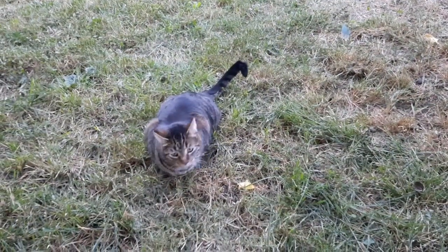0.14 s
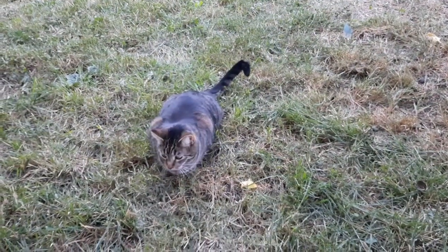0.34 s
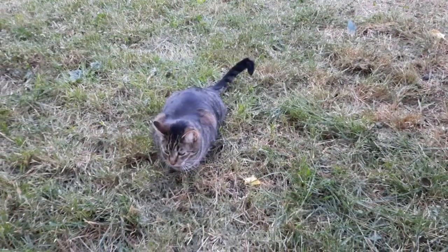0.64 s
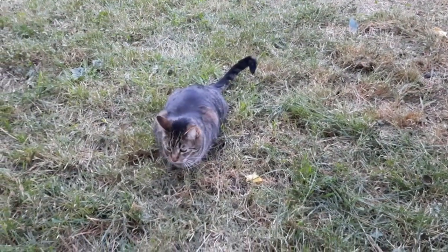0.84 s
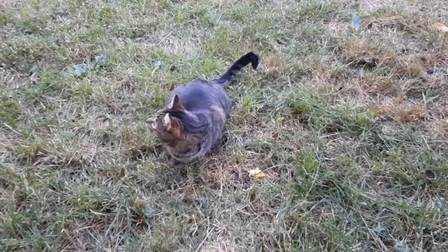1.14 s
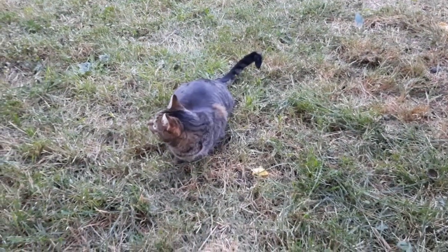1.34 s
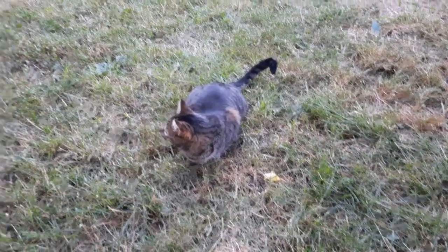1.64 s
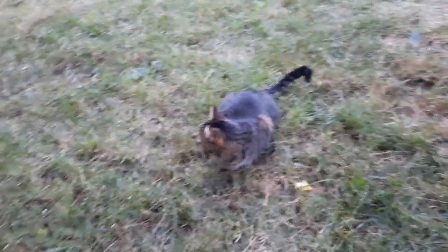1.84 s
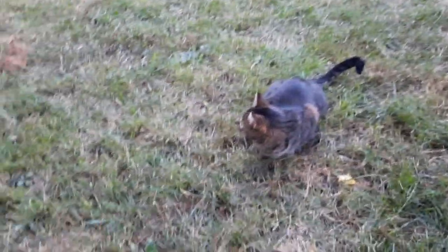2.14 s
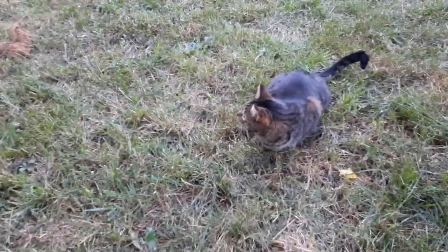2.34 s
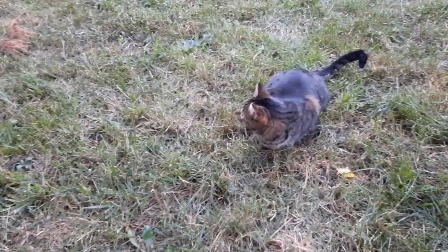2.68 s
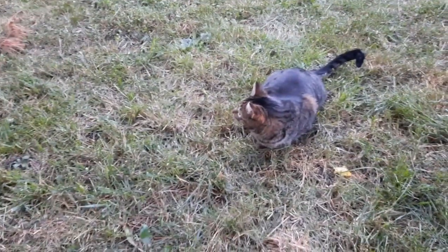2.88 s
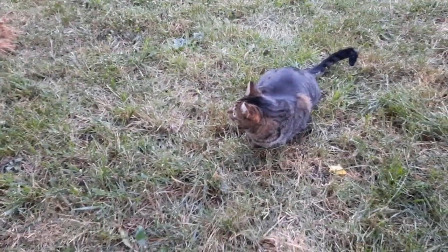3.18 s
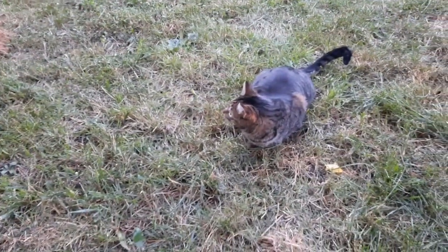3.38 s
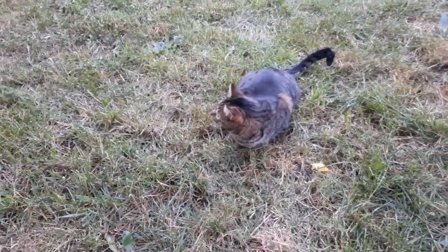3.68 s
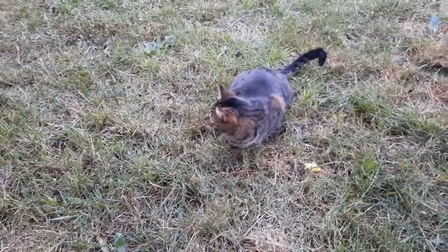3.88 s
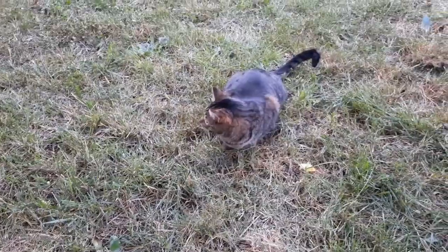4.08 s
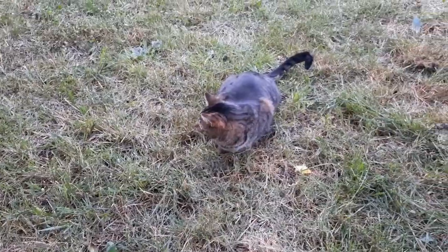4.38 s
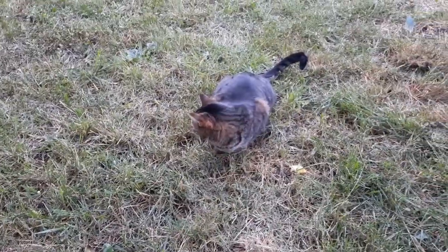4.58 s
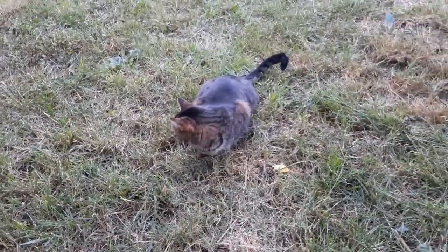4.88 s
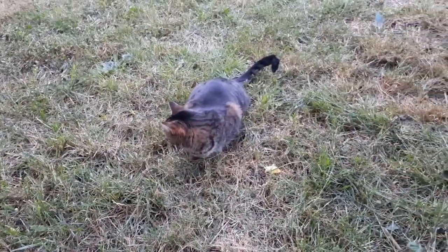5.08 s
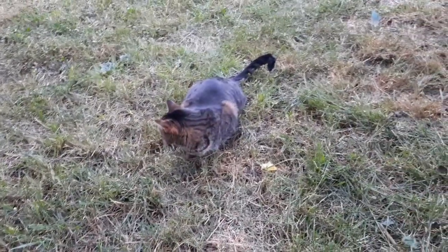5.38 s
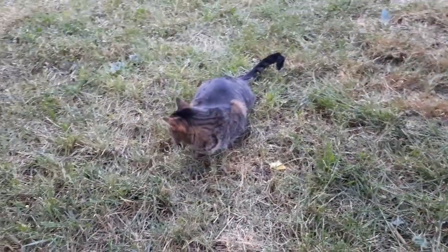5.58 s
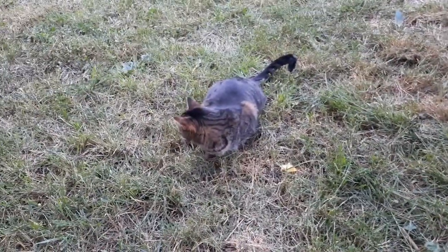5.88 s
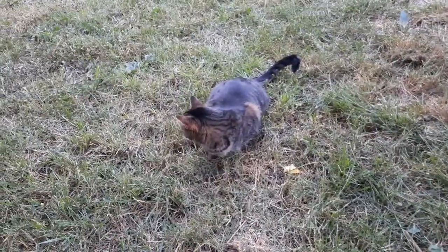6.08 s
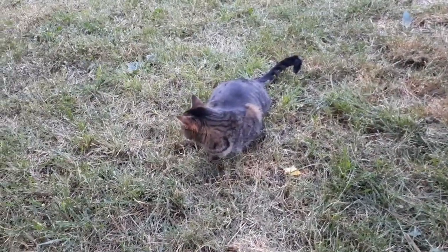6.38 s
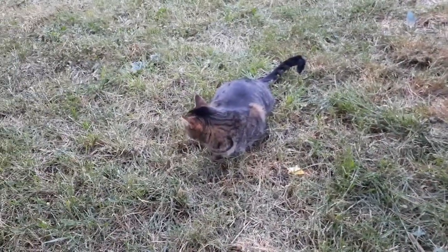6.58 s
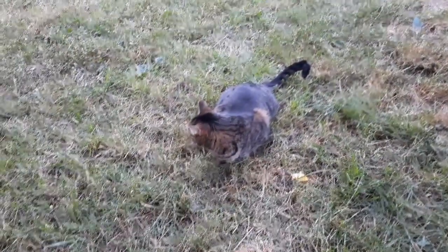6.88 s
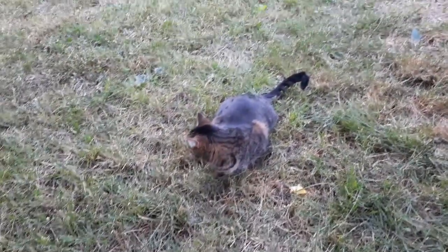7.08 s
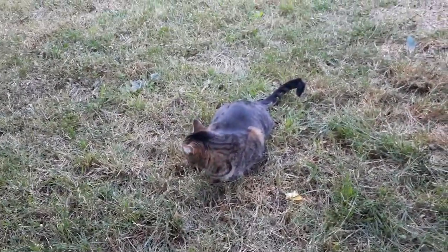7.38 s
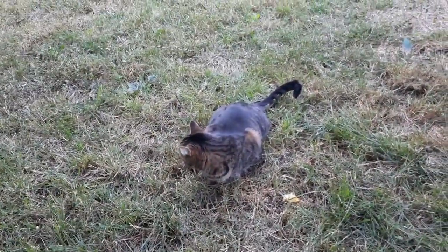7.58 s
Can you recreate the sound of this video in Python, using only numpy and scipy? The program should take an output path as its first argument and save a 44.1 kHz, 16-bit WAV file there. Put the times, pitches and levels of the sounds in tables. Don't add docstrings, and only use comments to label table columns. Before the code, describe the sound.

Shrill crickets trill steadily over a lawn while a nearby bird gives sparse sharp chips with short echoes, above a faint low hum and distant traffic.

```python
import sys
import numpy as np
from scipy import signal
from scipy.fft import rfft, irfft
from scipy.io import wavfile
from scipy.ndimage import uniform_filter1d

SR = 44100
rng = np.random.default_rng(int(sys.argv[2]) if len(sys.argv) > 2 else 0)


def how_loud(loudness_db):
    steps = np.asarray(loudness_db, float) / 20
    return 10 ** steps


def file_out(sig):
    cols = np.atleast_2d(sig).T
    lim = np.clip(cols, -1, 1)
    pcm = np.round(lim * 32767).astype(np.int16)
    wavfile.write(sys.argv[1], SR, pcm)


N = 340893
T = np.arange(N) / SR


def evened(x):
    return x / np.sqrt(np.mean(x ** 2) + 1e-20)


def read(table, hz, axis=1):
    table = np.array(table)
    return np.interp(np.log(hz + 1), np.log(table[:, 0] + 1), table[:, axis])


def curve(table, t, axis=1):
    table = np.array(table)
    return np.interp(t, table[:, 0], table[:, axis])


def sides(pan_db):
    return how_loud(np.array([.5 * pan_db, -.5 * pan_db]))


def drift(hz):
    rate = 400
    count = int(N / SR * rate) + 2
    pole = np.exp(-2 * np.pi * hz / rate)
    slow = signal.lfilter([1], [1, -pole], rng.standard_normal(count))
    return np.interp(T, np.arange(count) / rate, evened(slow))


def noise(db, same, size, patchy_db, lag_s=0):
    frames = 4 * N // size + 5
    hz = np.fft.rfftfreq(size, 1 / SR)[:, None]
    a, b, c, d, patches = rng.standard_normal((frames, len(hz), 5)).T
    patches = uniform_filter1d(patches, size=10, axis=0)
    patches = evened(uniform_filter1d(patches, size=10, axis=1))
    same = np.clip(same(hz), 0, 1)
    right = a + 1j * b
    delay = np.exp(-2j * np.pi * hz * lag_s)
    left = same * right * delay + np.sqrt(1 - same ** 2) * (c + 1j * d)
    level = db(hz, np.arange(frames) * size / 4 / SR) + patchy_db * patches
    z = np.array([left, right]) * how_loud(level)
    return evened(signal.istft(z, nperseg=size, noverlap=3 * size // 4)[1][:, :N])


# f/Hz, t60/s
YARD_DECAY = [(4500, 0.5), (6000, 0.4), (7500, 0.4), (11000, 0.38), (15000, 0.33)]
# f/Hz, likeness [0-1]
ECHO_LIKENESS = [(4500, .1), (6000, .4), (7100, .35), (7700, .75), (8400, .85), (12000, .55)]


def echoes(late_db, late_slowing, size):
    taps = np.zeros((2, size))
    at = np.arange(40, size - 20, 20) + rng.integers(0, 20, (2, (size - 41) // 20))
    strength = rng.standard_normal(at.shape) * how_loud(0.67 * rng.standard_normal(at.shape))
    np.put_along_axis(taps, at, strength, 1)
    taps *= 1 + 0.2 * np.exp(-np.arange(size) / SR / 0.045)
    hz, t, z = signal.stft(taps, SR, nperseg=128)
    alike = read(ECHO_LIKENESS, hz)[:, None]
    z = np.array([z[0], alike * z[0] + np.sqrt(1 - alike ** 2) * z[1]])
    fall_db = -60 * t / np.maximum(read(YARD_DECAY, hz), .05)[:, None]
    decay = how_loud(fall_db) + how_loud(late_db + fall_db / late_slowing)
    tail = signal.istft(z * decay, SR, nperseg=128)[1]
    return tail / np.linalg.norm(tail[0])


def scattered(x, clear, pan_db):
    clear = np.clip(clear, 0, 1)
    paths = echoes(late_db=-60, late_slowing=1, size=4096)
    wet = signal.oaconvolve(x[None], paths, axes=1)[:, :N]
    return sides(pan_db)[:, None] * (np.sqrt(clear) * x + np.sqrt(1 - clear) * wet)


PITCH_SCATTER = .01


def stridulate(hz, per_s, duty, sag):
    turns = np.cumsum(per_s * (1 + .006 * drift(1.5))) / SR + rng.random()
    u = np.minimum(turns % 1 / np.clip(duty, .1, 1), 1)
    strong, high, start = rng.standard_normal((1200, 3))[turns.astype(int) % 1200].T
    wing = hz * (1 + sag * (.5 - u) + PITCH_SCATTER * high)
    tone = np.sin(2 * np.pi * np.cumsum(wing) / SR + 2 * start)
    return evened(how_loud(0.57 * strong) * np.sin(np.pi * u) ** 2 * tone)


# wing f/Hz, level/dB, left-right level/dB, clear share [0-1]
TRILLERS = [(7500, 1, -4, .8), (7700, -3, 0, .35), (7980, -2.5, 1, .25), (7230, -7, -5, .15),
            (8170, -4, 2, .3), (8480, -11, 5, .3), (7820, -4, 0, .15), (6990, -15, -4, .1)]
STROKES_PER_S = [50.5, 50.7, 47.5, 52.5, 98.5, 101.2, 55, 58]
# t/s, level/dB, left-right level/dB
TRILL_COURSE = [(0.0, -65.5, 3.5), (0.64, -65, 4), (1.42, -63.5, 1.5), (2.2, -64.5, -1), (3.25, -63.5, 1),
                (4.0, -66, 3), (5.3, -65, 2), (6.1, -64, -2), (7.73, -65.5, 0)]
SWELL_DB = 1.6


def trill():
    out = 0
    for (hz, db, pan_db, clear), per_s in zip(TRILLERS, STROKES_PER_S):
        level = how_loud(db + SWELL_DB * drift(1.0))
        out = out + level * scattered(stridulate(hz, per_s, duty=0.49, sag=.05), clear, pan_db)
    return evened(out) * how_loud(curve(TRILL_COURSE, T) + 6.5) * sides(curve(TRILL_COURSE, T, axis=2))


# middle t/s, level/dB, length t/s
CHIRP_WAVES = [(.1, -68, 0.36), (0.616, -63.5, 0.25), (1.0, -69, 0.27), (1.4, -67.5, 0.22),
               (1.857, -65, .22), (2.27, -64, 0.27), (2.63, -64, 0.25), (3.04, -67, 0.47),
               (3.463, -67.5, 0.41), (3.973, -66, 0.31), (4.3, -70, 0.14), (4.5, -65, 0.18),
               (4.72, -64.5, 0.17), (5.04, -68.5, 0.36), (5.467, -66.5, 0.2), (5.778, -68, 0.31),
               (6.17, -68, 0.43), (6.58, -62.5, 0.32), (6.994, -68, 0.19), (7.23, -67, .18),
               (7.5, -76, .12), (7.677, -72, .12)]
FIELD_WING_HZ, FIELD_REST_DB = 4655, -81.5


def chirps():
    wing = FIELD_WING_HZ * (1 + .012 * drift(3.0))
    out = 0
    for share, per_s in [(1.0, 24.5), (.975, 29), (1.025, 21)]:
        out = out + scattered(stridulate(wing * share, per_s, duty=0.48, sag=0.028), 0.03, 2.1)
    waves = 0
    for s, db, length in CHIRP_WAVES:
        waves = waves + how_loud(db) * np.cos(np.pi * np.clip(0.65 * (T - s) / length, -.5, .5)) ** 2
    return evened(out) * (waves + how_loud(FIELD_REST_DB)) * how_loud(-5.0)


SWEEP_HZ, OVERTONE_DB = 2570, -12
LOUDEST, ACCENT = .57, .7
LAG_PER_DB = 2.4
AVERTED = .4


def chip(peak_db, pan_db, start_hz, echo_db):
    u = np.arange(420) / 420
    hz = start_hz + SWEEP_HZ * np.sin(1.83 * u) ** 1.307
    phase = 2 * np.pi * np.cumsum(hz) / SR
    swell = ACCENT * np.exp(-((u - LOUDEST) / .14) ** 2) + (1 - ACCENT) * np.sin(np.pi * u)
    overtone = how_loud(OVERTONE_DB) * np.sin(np.pi * u ** 0.71) ** 1.9 * np.sin(2 * phase)
    whistle = swell * np.sin(phase) + overtone
    direct = whistle - (1 - how_loud(-AVERTED * max(echo_db, 0))) * overtone
    yard = echoes(late_db=-12.0, late_slowing=1.76, size=22050)
    wet = signal.fftconvolve(whistle[None], yard, axes=1)
    wet = how_loud(echo_db) * sides(0.19 * pan_db - 2.5)[:, None] * wet
    lag = round(LAG_PER_DB * max(-pan_db, 0))
    wet[0, lag:lag + len(u)] += sides(pan_db)[0] * direct
    wet[1, :len(u)] += sides(pan_db)[1] * direct
    return how_loud(peak_db + 3) * wet


# t/s, direct peak level/dB, left-right level/dB, sweep start f/Hz, echo over direct level/dB
CHIPS = [
    (.4964, -15.5, -7.5, 5000, -7),
    (1.1795, -28, -4, 4900, 2),
    (2.159, -36, 0, 4950, 8),
    (3.1122, -38, 1, 5200, 9),
    (3.979, -34, 1, 5250, 7),
    (6.4906, -34, 6, 5250, 9),
]
# t/s, peak level/dB, f/Hz, length t/s, glide [share of f]
WHISTLES = [(.09, -69, 3520, .04, 0), (.652, -64, 4060, .014, -.02), (.72, -70, 3620, .04, 0),
            (4.98, -67, 2180, .05, .1), (5.45, -70, 3350, .07, 0), (5.72, -63, 3420, .028, -.05),
            (5.79, -70, 3480, .08, -.02), (6.35, -64, 3400, .03, 0), (6.43, -69, 3900, .02, 0),
            (6.45, -67, 3400, .025, 0), (6.70, -69, 3380, .04, 0), (7.18, -69, 3800, .02, 0),
            (7.195, -64, 3280, .04, -.07), (7.26, -70, 3880, .02, 0), (7.28, -67, 3300, .04, 0)]
# f/Hz, level/dB
RIGHT_PORT = [(8000, -1.5), (8600, -8), (10500, -48.5), (13000, -26), (16000, -8)]
FAR_DB = -1.5


def birds():
    near, far = np.zeros((2, N + SR)), np.zeros(N + SR)
    for s, *row in CHIPS:
        sound, at = chip(*row), round((s - .005) * SR)
        near[:, at:at + sound.shape[1]] += sound
    for s, db, hz, length, glide in WHISTLES:
        u = np.arange(0, 1, 1 / (1.1 * length * SR))
        wander = evened(uniform_filter1d(rng.standard_normal(len(u)), size=200))
        warble = glide * (u - .5) + .02 * wander
        tone = np.sin(2 * np.pi * np.cumsum(hz * (1 + warble)) / SR)
        far[round(s * SR):][:len(u)] += how_loud(db - FAR_DB) * np.sin(np.pi * u) * tone
    spectrum = rfft(near)
    spectrum[1] *= how_loud(read(RIGHT_PORT, np.fft.rfftfreq(N + SR, 1 / SR)))
    shadowed = irfft(spectrum, N + SR)[:, :N]
    return shadowed + scattered(far[:N] * how_loud(3 * drift(80) - 5), .75, 2.5)


ORDERS = [3.44, 4, 5, 15, 20, 47, 48, 49, 58, 73, 90, 91, 92, 98, 100]
ORDERS_DB = [-68, -68, -66, -85, -87, -89, -81.5, -86, -90, -89, -88, -88, -88, -89, -89]
# t/s, level/dB
WHINE = [(0.0, -99), (0.5, -85), (1.15, -86.5), (1.4, -82.5), (2.5, -84.5), (4.7, -83), (5.2, -86),
         (5.55, -103), (6.8, -103), (7.3, -87), (7.73, -93)]
SHAFT_HZ, WHINE_ORDER = 58.6, 33
HUM_DB, NEIGHBOUR_DB = -57, -59
BEAT_HZ, IN_STEP_S = 0.4085, 0.72
LAG_S = 20 / SR


def compressor():
    turn = 2 * np.pi * np.cumsum(SHAFT_HZ * (1 + 0.000624 * drift(1.54))) / SR
    slip = 2 * np.pi * BEAT_HZ * (T - IN_STEP_S)
    out = how_loud(HUM_DB + 2.8 * drift(2.5)) * np.sin(2 * turn)
    out += how_loud(NEIGHBOUR_DB + 1.7 * drift(2.5)) * np.sin(2 * turn - slip)
    out += how_loud(curve(WHINE, T) + 8.5 + 1.6 * drift(5.9)) * np.sin(WHINE_ORDER * turn)
    for order, db in zip(ORDERS, ORDERS_DB):
        out += how_loud(db + 1.0 * drift(4.4)) * np.sin(order * turn + 6 * rng.random())
    return np.array([np.roll(out, round(LAG_S * SR)), out])


# f/Hz, density level/dB per Hz
TRAFFIC_SPECTRUM = [(15, -41), (25, -32), (56, -1), (107, -2), (213, -11.5), (328, -4.5), (424, -14),
                    (492, -14.5), (560, -19.5), (977, -23), (1530, -28), (2510, -32.5), (2790, -30.5),
                    (3770, -37.5), (4200, -35), (5460, -42), (9240, -120)]
# t/s, level/dB
TRAFFIC_SWELL = [(0.0, -59), (0.3, -54.5), (1.7, -56.5), (2.5, -57.5), (3.4, -55.5), (3.7, -57.5),
                 (5.3, -55.5), (5.8, -59), (6.5, -56.5), (7.73, -57.5)]
# f/Hz, likeness [0-1], left-right level/dB
PORTS = [(41, 0.95, 0), (156, 0.92, -2), (337, .76, -1.5), (583, 0.3, 2.5), (1200, 0.52, 5),
         (2500, 0.17, 3), (4200, 0.05, 4)]
STEADY_TOP = 0.31


def traffic():
    def db(hz, t):
        swell = curve(TRAFFIC_SWELL, t)
        swell = swell - swell.mean()
        share = np.maximum(1 - STEADY_TOP * np.log2(np.maximum(hz / 400, 1)), 0)
        level = read(TRAFFIC_SPECTRUM, hz) + swell * share
        half_pan = .5 * read(PORTS, hz, axis=2)
        return np.array([level + half_pan, level - half_pan])
    return how_loud(-52.5) * noise(db, lambda hz: read(PORTS, hz), size=2048, patchy_db=1.5, lag_s=LAG_S)


# f/Hz, left level/dB, right level/dB
HISS = [(3500, -12, -14), (4300, 0, -3), (5400, 3, 8), (6200, 0, 5), (6800, 4, 8), (8600, 2, -2),
        (9200, -5, -11), (10200, -4.5, -11), (11300, -2, -8), (11900, -4.5, -9), (13500, -2.5, -8),
        (14400, -3, -7), (14800, 0, -4), (16500, 1, -4)]
# t/s, level/dB, spread t/s
GUSTS = [
    (4.7, 3, .09),
    (4.74, 4, .008),
    (5.62, 4.5, .07),
    (5.6, 5, .008),
    (6.22, 3, .04),
]
RUSTLE_DB, SETTLING_DB, SETTLE_S = -85.2, 4.5, .15


def hiss():
    def db(hz, t):
        gust = sum(rise * np.exp(-((t - s) / spread) ** 2) for s, rise, spread in GUSTS)
        settling = SETTLING_DB * np.exp(-t / SETTLE_S)
        level = RUSTLE_DB + settling + gust * (hz > 5200) - 60 * (hz < 3000)
        return np.array([level + read(HISS, hz), level + read(HISS, hz, axis=2)])
    return how_loud(-67.5) * noise(db, lambda hz: 0.25 + 0.45 * (hz > 9000), size=512, patchy_db=0.6)


def gated(x):
    hz, t, z = signal.stft(x, SR, nperseg=1024)
    chip_band = (hz > 5300) & (hz < 6800)
    cover_db = 10 * np.log10((abs(z[:, chip_band]) ** 2).sum((0, 1)) + 1e-14)
    attack = np.diff(cover_db, prepend=0) >= 3
    cover_db = (cover_db - np.median(cover_db)) * ~attack
    patches = rng.standard_normal((len(t), len(hz) // 5 + 1)).T.repeat(5, 0)[:len(hz)]
    patches = evened(uniform_filter1d(patches, size=4, axis=1))
    above = ((hz > 8950) & (hz < 10300))[:, None] & (cover_db + 4 * patches > 3)
    below = ((hz > 3000) & (hz < 4200))[:, None] & (np.minimum(cover_db, 14) / 2.5 + 4 * patches > 6)
    return signal.istft(z * ~(above | below), SR, nperseg=1024)[1][:, :N]


def scene():
    return trill() + chirps() + birds() + compressor() + traffic() + hiss()


def band_limit(x):
    return signal.sosfilt(signal.butter(12, 16480, fs=SR, output="sos"), x)


def record(dry):
    bass_cut = signal.butter(3, 42, "highpass", fs=SR, output="sos")
    low_cut = signal.sosfilt(bass_cut, dry)
    treble_cut = signal.firwin(1023, 15750, window=("kaiser", 8), fs=SR)
    limited = signal.oaconvolve(low_cut, treble_cut[None], "same")
    return band_limit(gated(limited))


dry = scene()
out = record(dry)
file_out(out)
```